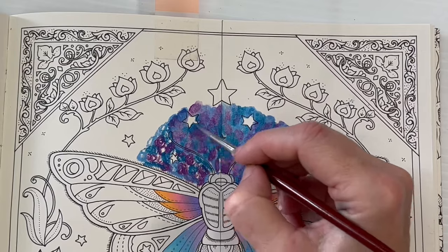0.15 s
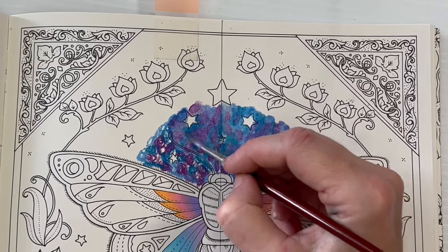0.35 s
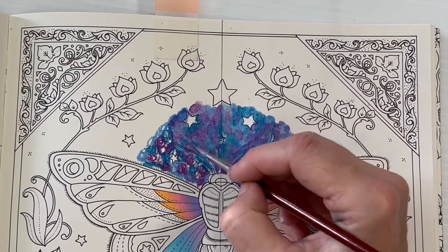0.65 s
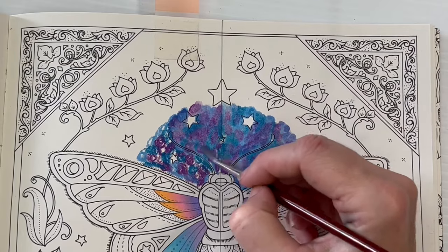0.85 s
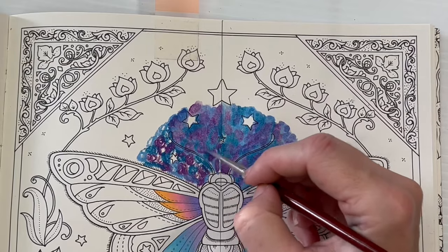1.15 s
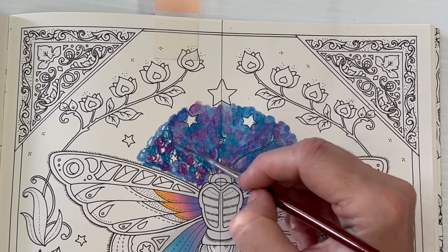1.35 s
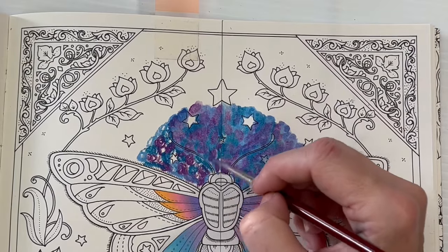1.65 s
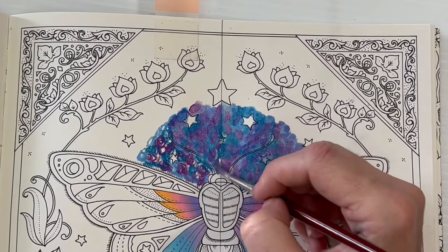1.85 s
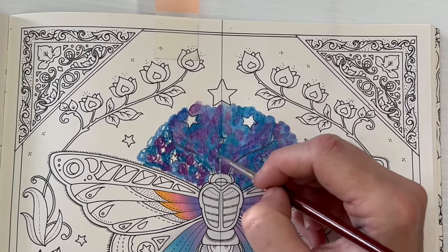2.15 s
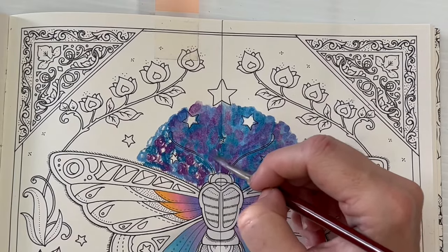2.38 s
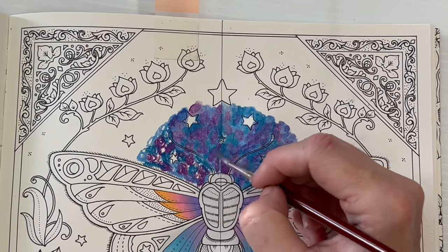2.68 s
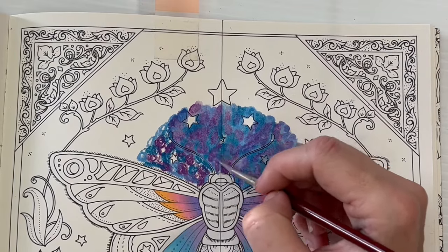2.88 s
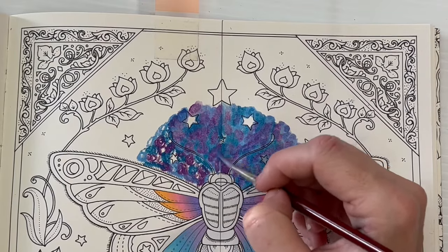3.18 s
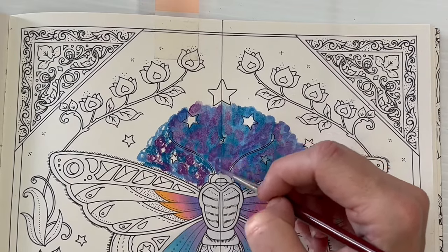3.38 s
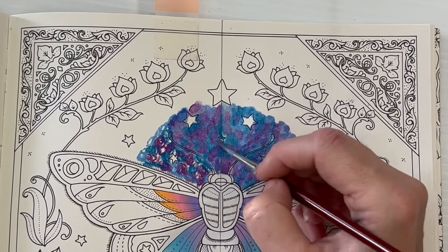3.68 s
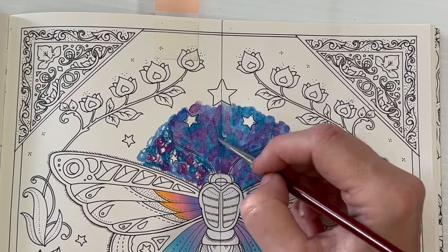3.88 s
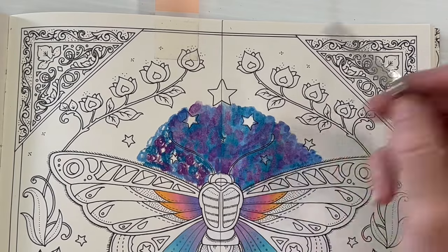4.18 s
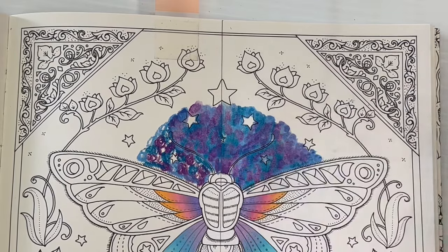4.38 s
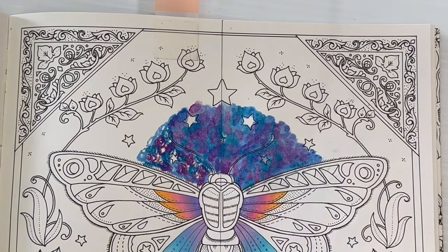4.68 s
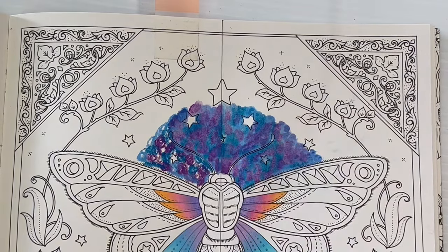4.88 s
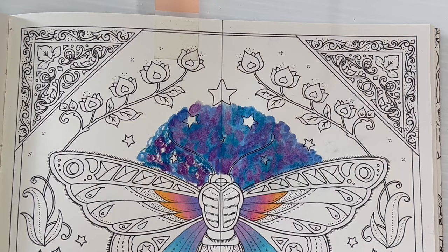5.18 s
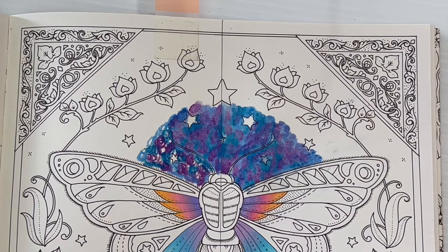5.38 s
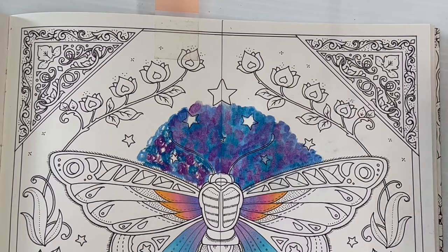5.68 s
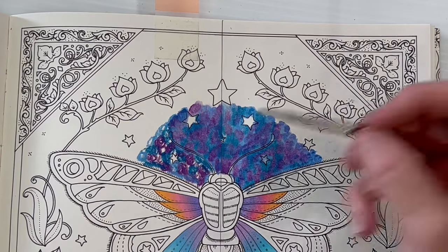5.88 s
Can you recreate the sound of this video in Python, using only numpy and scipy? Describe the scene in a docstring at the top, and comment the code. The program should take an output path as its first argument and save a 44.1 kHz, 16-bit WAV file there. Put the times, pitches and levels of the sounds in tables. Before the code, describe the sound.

A small, quiet room heard close to a desk, with soft air noise and a faint mains hum. Behind it a low engine drone, like a distant propeller plane, throbs early, slowly sinks in pitch and flutters, its rumble nearest around 4 s. From 0 to 3.5 s soft grainy rubs on paper come and go, with faint dabs and tiny ticks, one clearer at 2.6 s. A faint low whistle sounds at 2.9 s and tiny falling chirps near 3.6 and 4.1 s. Bristles swish at 3.6 and 4.1 s, with crisp snaps at 4.2 and 4.3 s. At 4.7 s a brush knocks a glass jar: a bright, high ring with a dull bump and a quick spatter of bubbly drops. At 5.06 s a second knock clacks, choked short. A faint whistle and tick follow at 5.4 s, then light swishes from 5.8 s and a dull desk tap at 6 s.

```python
"""A brush is knocked twice on a glass water jar: decaying glass modes under a handle click and a ferrule clack.
The first knock rings free and shakes drops into the water, as short bubble tones; the second is choked on the rim.
Around it someone paints at a desk in a small room: shaped noise makes soft rubs on paper, bristle swishes and ticks.
Behind, sinking tones and rumble make a far engine, like a passing propeller plane; gliding tones make faint
chirps and whistles, perhaps a bird outside; air noise and a mains hum fill the room."""
import sys
import numpy as np
from scipy import signal
from scipy.fft import rfft, irfft, next_fast_len
from scipy.io import wavfile
from scipy.ndimage import uniform_filter1d, map_coordinates

SR = 44100
rng = np.random.default_rng(int(sys.argv[2]) if len(sys.argv) > 2 else 0)


def file_out(sig):
    """Save sig as 16-bit WAV at sys.argv[1]."""
    # one column per channel
    cols = np.atleast_2d(sig).T
    # limit, then scale
    lim = np.clip(cols, -1, 1)
    pcm = np.round(lim * 32767).astype(np.int16)
    wavfile.write(sys.argv[1], SR, pcm)


N = 266364  # length of the scene in samples


def amp(db):
    """Decibels to gain."""
    return 10 ** (np.asarray(db) / 20)


def unit(x):
    """Scale to rms 1."""
    return x / np.sqrt(np.mean(x ** 2) + 1e-20)


def along(points, hz):
    """Read (frequency [Hz], value) points on a log frequency axis."""
    f, v = np.transpose(points)
    return np.interp(np.log(hz + 1), np.log(f + 1), v)


def curve(rows):
    """Read (time [s], value) points at every sample."""
    return np.interp(np.arange(N) / SR, *np.transpose(rows))


def wobble(rate):
    """A smooth random curve with rate knots a second."""
    knots = rng.standard_normal(int(N * rate / SR) + 4)
    return map_coordinates(knots, [np.arange(N) * rate / SR])


def filtered(x, response):
    """Shape x with a response given as a function of frequency."""
    n = x.shape[-1]
    padded = next_fast_len(n + SR // 4)
    spectrum = rfft(x, padded) * response(np.fft.rfftfreq(padded, 1 / SR))
    return irfft(spectrum, padded)[..., :n]


def coloured(spectrum, shape):
    """Noise of rms 1 with the given spectrum."""
    white = rng.standard_normal(shape)
    return unit(filtered(white, lambda hz: amp(along(spectrum, hz))))


def add(track, s, sound):
    """Mix a sound into the track at time s."""
    part = track[..., round(s * SR):][..., :sound.shape[-1]]
    part += sound[..., :part.shape[-1]]


# how alike left and right are: (frequency [Hz], likeness [0-1])
LIKENESS = [(100, 1), (290, .9), (640, 0.21), (1400, 0.32), (2300, 1), (4500, 1), (7000, 0.29),
            (15000, .15)]


def diffuse(spectrum):
    """Stereo noise that arrives from all round the room: a shared middle plus opposed sides."""
    def mid_side_gains(hz):
        turn = np.arccos(np.clip(along(LIKENESS, hz), -1, 1)) / 2
        return np.array([np.cos(turn), np.sin(turn)])
    mid, side = filtered(coloured(spectrum, (2, N)), mid_side_gains)
    return unit(np.array([mid + side, mid - side]))


def patchy(x, depth_db):
    """The colour of a noise shifts from moment to moment."""
    z = signal.stft(x, nperseg=1024)[2]
    field = rng.standard_normal(z.shape[1:])
    field = uniform_filter1d(field, size=4, axis=0)  # over frequency
    field = uniform_filter1d(field, size=14, axis=1)  # over time
    return signal.istft(z * amp(depth_db * unit(field)), nperseg=1024)[1][:, :N]


# how long the room's tail lasts: (frequency [Hz], decay t60 [s])
ROOM_DECAY = [(200, 0.92), (3000, 0.34), (7000, 0.35), (11000, 0.33), (15000, .22)]


def room(x, build_s, lasting=1):
    """The walls' answer: it builds up, then each frequency dies at its own speed."""
    hz, t, z = signal.stft(rng.standard_normal((2, SR // 2)), SR, nperseg=256)
    width = along([(2500, 0.083), (4500, 0.24), (7000, 0.99)], hz)[:, None]  # wider in the treble
    z = np.array([z[0] + width * z[1], z[0] - width * z[1]]) / np.sqrt(1 + width ** 2)
    t60 = lasting * along(ROOM_DECAY, hz)[:, None]
    envelope = amp(-60 * t / t60) * (1 - np.exp(-t / build_s))
    tail = signal.istft(z * envelope, SR, nperseg=256)[1]
    return signal.fftconvolve(x[None], tail / np.linalg.norm(tail[0]), axes=1)[:, :N]


def from_right(x, lag_s):
    """A near sound reaches the right side a moment before the left."""
    side = np.array([[-1], [1]])
    return filtered(x, lambda hz: np.exp(np.pi * 1j * hz * lag_s * side))


# the air's starting level eases off slowly
AIR_DB, AIR_FALL_DB_PER_S = -58, .5
# relative spectrum of the room's air: (frequency [Hz], density [dB per Hz])
AIR_SPECTRUM = [(100, 1.5), (300, -2), (430, 1.2), (600, 1.5), (1000, 1), (1350, -1), (1520, 1), (1750, -7),
                (2350, -12), (2650, -10.5), (2950, -16.5), (3500, -19), (4500, -26), (6000, -31.5),
                (11000, -36), (15500, -48.5)]
# stereo balance of the air: (frequency [Hz], left minus right [dB])
AIR_BALANCE = [(400, 1.5), (750, -0.5), (1290, -5.5), (2200, 0)]


def room_tone():
    """Soft air noise, leaning right in the mid band, and a faint mains hum that wavers in level."""
    t = np.arange(N) / SR
    mains = amp(-55.5 + 2.6 * wobble(3.0)) * np.sin(2 * np.pi * 100 * t)  # 100 Hz
    side = np.array([[1], [-1]])
    air = patchy(diffuse(AIR_SPECTRUM), depth_db=2.0)
    air = filtered(air, lambda hz: amp(along(AIR_BALANCE, hz) / 2 * side))
    return mains + amp(AIR_DB - AIR_FALL_DB_PER_S * t + 0.78 * wobble(5.2)) * air


# the engine's two notes start here and sink steadily as it passes
MAIN_HZ, MAIN_SAG_HZ_PER_S = 82.2, 1.18
LOWER_HZ, LOWER_SAG_HZ_PER_S = 70, 1.55
# the main note throbs at first, ever faster and shallower
THROB_START_S, THROB_PER_S, THROB_GAIN_PER_S2 = .05, 2.2, 1.8
THROB_DB, THROB_FADE_S = 4, 1.5
# the rumble swells to this level at the nearest point of the pass, then recedes
RUMBLE_DB, NEAREST_S, PASS_S = -50.5, 4.1, 3.5
# main note: (time [s], level [dB])
MAIN_LEVEL = [(0, -47), (.22, -44), (.36, -37.5), (.8, -37.5), (1.6, -40), (2.2, -39.5), (2.35, -43.5),
              (2.7, -41), (3.3, -41), (5.1, -48), (5.8, -44.5)]
# its octave overtone: (time [s], level [dB])
OCTAVE_LEVEL = [(0, -53), (.65, -48.5), (1.7, -52), (2.3, -47.5), (3.6, -47.5), (6.04, -69)]
# lower note: (time [s], level [dB])
LOWER_LEVEL = [(0, -59.5), (2.6, -57), (2.8, -44.5), (3, -40.5), (3.2, -52.5), (3.7, -58), (4.8, -54.5),
               (4.95, -47), (6.04, -61)]
# relative spectrum of the rumble: (frequency [Hz], density [dB per Hz])
RUMBLE_SPECTRUM = [(20, -20), (35, -9.5), (55, 3.5), (90, -6), (115, 2), (140, 3), (200, 1), (240, -3),
                   (290, -18.5), (450, -24), (1000, -62.5)]


def engine(main_flutter_db, octave_flutter_db, lower_flutter_db):
    """Low notes and rumble come through the walls; moving air makes them flutter, and they beat as they sink."""
    t = np.arange(N) / SR
    main_phase = 2 * np.pi * np.cumsum(MAIN_HZ - MAIN_SAG_HZ_PER_S * t) / SR
    lower_phase = 2 * np.pi * np.cumsum(LOWER_HZ - LOWER_SAG_HZ_PER_S * t) / SR

    age = t - THROB_START_S
    throbs = age * (THROB_PER_S + THROB_GAIN_PER_S2 * age / 2)
    throb_db = THROB_DB * np.exp(-age / THROB_FADE_S) * np.cos(2 * np.pi * throbs)

    main_db = curve(MAIN_LEVEL) + throb_db + main_flutter_db * wobble(7)
    main = amp(main_db) * np.sin(main_phase + 0.18 * wobble(11.0))
    octave_db = curve(OCTAVE_LEVEL) + octave_flutter_db * wobble(9)
    octave = amp(octave_db) * np.sin(2 * main_phase + rng.uniform(0, 2 * np.pi))
    lower_db = curve(LOWER_LEVEL) + lower_flutter_db * wobble(5.5)
    lower = amp(lower_db) * np.sin(lower_phase + 0.13 * wobble(2.0))

    nearness = 1 / np.hypot(1, (t - NEAREST_S) / PASS_S)
    rumble = nearness * amp(RUMBLE_DB + 1.2 * wobble(8)) * diffuse(RUMBLE_SPECTRUM)
    return np.sqrt(2) * (main + octave + lower) + rumble  # root 2: note levels are rms


# falling chirps and two lower whistles, levels before the mix:
# (time [s], length [s], first pitch [Hz], final pitch [Hz], glide [s], level [dB])
BIRD_NOTES = [(2.88, 0.063, 1525, 1493, .02, -67), (3.594, 0.053, 6500, 5210, .009, -67.5),
              (3.634, 0.018, 4550, 3530, .008, -59), (4.111, .03, 6100, 5180, .006, -67.5),
              (4.143, .05, 4730, 3190, .006, -58.5), (5.41, 0.053, 1476, 1470, 0.03, -63.5)]


def bird(rough):
    """Slightly hoarse notes that swell fast, hang on their first pitch for a moment, drop and level off."""
    out = np.zeros(N)
    for s, length, first_hz, final_hz, glide_s, db in BIRD_NOTES:
        t = np.arange(round(length * SR)) / SR
        glide = np.exp(-(t / glide_s) ** 3)
        hz = final_hz + (first_hz - final_hz) * glide
        hz = hz * (1 + rough * wobble(900)[:len(t)])
        swell = np.sin(np.pi * (t / length) ** .7)
        add(out, s, amp(db) * swell * np.sin(2 * np.pi * np.cumsum(hz) / SR))
    return out


# soft rubbing swells on the paper, from the hand or brush strokes: (time [s], length [s], level [dB])
PAPER_RUBS = [(0.079, 0.24, -69), (0.598, 0.49, -66), (1.241, .58, -74.5), (1.841, .44, -75),
              (2.601, .42, -78), (3.032, .5, -76), (4.098, .17, -70), (4.301, 0.28, -77),
              (5.856, 0.22, -76.5)]
# relative spectrum of rubbed paper: (frequency [Hz], density [dB per Hz])
PAPER_SPECTRUM = [(600, -5.5), (1500, 12.5), (2200, 4), (2650, 7), (3100, 0.5), (4700, -1), (5600, -6),
                  (7000, -19), (12000, -25.5), (15500, -29.5)]


def paper_rubs(grain_db):
    """The hand or brush strokes rub the paper in soft, slightly grainy swells of noise."""
    out = np.zeros(N)
    for s, length, db in PAPER_RUBS:
        u = np.linspace(0, 1, round(length * SR))
        rub = coloured(PAPER_SPECTRUM, N)[:len(u)]
        add(out, s, amp(db) * np.sin(np.pi * u) * rub)
    return out * amp(grain_db * wobble(120))


# soft swishes of the wet bristles: (time [s], length [s], level [dB])
BRISTLE_SWISHES = [(3.585, 0.14, -69), (4.11, 0.218, -65.5), (5.785, 0.13, -71), (5.92, 0.19, -74.5)]
# relative spectrum of dragging bristles: (frequency [Hz], density [dB per Hz])
BRISTLE_SPECTRUM = [(2000, -20), (4000, -1), (5500, 5.5), (7700, -4), (9500, -13), (15500, -22)]


def swishes(rise_s, grain_db):
    """Bristles drag briefly and unevenly: a quick swell and a slow release."""
    out = np.zeros(N)
    for s, length, db in BRISTLE_SWISHES:
        t = np.arange(round(length * SR)) / SR
        swell = (1 - np.exp(-t / rise_s)) * (1 - t / length)
        add(out, s, amp(db) * swell * coloured(BRISTLE_SPECTRUM, len(t)))
    return out * amp(grain_db * wobble(90))


# the clearest ticks of wet bristles and ferrule: (time [s], level [dB], before the snap's trim)
CLEAR_TICKS = [(0.3273, -67), (0.7048, -66), (2.142, -68), (2.4788, -66), (2.646, -56), (2.9756, -67),
               (3.8247, -70), (3.9754, -70), (4.1212, -53), (4.1323, -52), (4.1808, -40), (4.291, -34.5),
               (5.4534, -60), (5.911, -62)]
# faint dabs while painting: the stretch they fill, mean level before the trim, and scatter
PAINT_START_S, PAINT_END_S, DAB_DB, DAB_SCATTER_DB = 0.11, 3.3, -73.5, 3
# relative spectrum of a tick: (frequency [Hz], density [dB per Hz])
TICK_SPECTRUM = [(1000, -14), (3000, -9.5), (5500, 5), (7500, 5), (10000, -4), (11700, -4.5), (15500, -12)]
TAP_S, TAP_DB, TAP_T60_S = 6.0165, -45, 0.025  # a dull tap on the desk
# relative spectrum of the tap: (frequency [Hz], density [dB per Hz])
TAP_SPECTRUM = [(150, -20), (400, 17), (900, -11), (1800, 3), (4200, -17), (8500, -14.5), (10500, -33)]


def ticks(t60, smear_db, smear_t60, count):
    """Tiny snaps as the brush touches things, each in a soft scuff of bristles; one dull tap as the hand returns."""
    out, t = np.zeros(N), np.arange(SR // 20) / SR
    # one dab at a random moment in each equal slice of the stretch
    slices = (np.arange(count) + rng.random(count)) / count
    dab_s = PAINT_START_S + (PAINT_END_S - PAINT_START_S) * slices
    dabs = zip(dab_s, DAB_DB + DAB_SCATTER_DB * rng.standard_normal(count))
    for s, db in [*CLEAR_TICKS, *dabs]:
        snap = amp(db - 6.5 - 60 * t / t60)  # 6.5 dB trim
        scuff = amp(smear_db - 60 * t / smear_t60) * (1 - np.exp(-t / 0.0035))
        add(out, s, (snap + scuff) * coloured(TICK_SPECTRUM, len(t)))
    add(out, TAP_S, amp(TAP_DB - 60 * t / TAP_T60_S) * coloured(TAP_SPECTRUM, len(t)))
    return out


THUD_DB, THUD_T60_S = -47.5, 0.06  # level before each knock's ring level is added
# relative spectrum of the bump: (frequency [Hz], density [dB per Hz])
THUD_SPECTRUM = [(200, -8.5), (350, 0), (560, 6), (900, -3), (1400, -9), (2000, 2.5), (2800, 2),
                 (3600, -20)]


def thuds():
    """Each knock pushes the full jar against the desk: a short dull bump that follows the ring's strength."""
    out, t = np.zeros(N), np.arange(SR // 10) / SR
    for s, ring_db, *_ in RIM_KNOCKS:
        bump = amp(THUD_DB + ring_db - 60 * t / THUD_T60_S)
        add(out, s, bump * coloured(THUD_SPECTRUM, len(t)))
    return out


# the water churns under the drops: (time [s], level [dB])
SLOSH_LEVEL = [(4.69, -85), (4.705, -53), (4.755, -56.5), (4.785, -71), (4.817, -55.5), (4.87, -64),
               (4.97, -90)]
# relative spectrum of the churning: (frequency [Hz], density [dB per Hz])
WATER_SPECTRUM = [(250, -5), (400, 1.5), (600, 3), (950, 0), (1400, -4), (2600, 4), (3800, -10.5),
                  (6000, -14), (12000, -26)]


def slosh(lumps_db):
    """The water splashes about in uneven lumps of noise."""
    lumpy = amp(lumps_db * wobble(250)) * coloured(WATER_SPECTRUM, N)
    return amp(curve(SLOSH_LEVEL)) * unit(lumpy)


# the biggest drops, before a 1 dB lift:
# (time [s], pitch [Hz], level [dB], rise [share of the pitch])
BIG_DROPS = [(4.705, 1220, -46.5, 0.22), (4.729, 1950, -41.5, .3), (4.745, 2500, -41, -.1),
             (4.749, 960, -49, 0.1), (4.782, 4400, -47, 0.63), (4.801, 3600, -43, .1),
             (4.804, 1710, -47, .25), (4.81, 2900, -38, -0.098), (4.814, 2400, -42, .15),
             (4.815, 764, -44.5, .1), (4.823, 3400, -45, .5), (4.829, 4500, -51, 0.6),
             (4.841, 4850, -44, 0.8), (4.856, 2640, -47, -.05), (4.863, 1570, -45, 0.34),
             (4.884, 3600, -53.5, 0.091), (4.907, 3530, -50, 0.03)]
# the finer spray: its length, middle pitch and pitch range
SPRAY_S, SPRAY_HZ, SPRAY_OCTAVES = .2, 1493, 3.4
# its top level before the lift, range of strengths, and fading
SPRAY_DB, SPRAY_RANGE_DB, SPRAY_FADE_DB_PER_S = -49, 9, 46


def drops(cycles, spray_rise, count):
    """Each drop traps a bubble that rings briefly and mostly rises in pitch; a finer spray dies away among them."""
    out, t = np.zeros(N), np.arange(SR // 16) / SR
    when, size, weakness, bend = rng.random((count, 4)).T
    delay = SPRAY_S * (np.arange(count) + when) / count
    spray_s = RIM_KNOCKS[0][0] + delay  # counted from the first knock
    spray_hz = SPRAY_HZ * 2 ** (SPRAY_OCTAVES * (size - .5))
    spray_db = SPRAY_DB - SPRAY_RANGE_DB * weakness - SPRAY_FADE_DB_PER_S * delay
    spray = np.transpose([spray_s, spray_hz, spray_db, spray_rise * bend])
    for s, hz, db, rise in [*BIG_DROPS, *spray]:
        age = t / (cycles / hz + 0.017)  # in t60s: low bubbles ring longer
        phase = 2 * np.pi * np.cumsum(hz * (1 + rise * np.minimum(age, 1))) / SR
        add(out, s, amp(db + 1.0 - 60 * age) * (1 - np.exp(-t / 0.0023)) * np.sin(phase))
    return out


# handle on the rim: (time [s], glass ring [dB], handle click [dB], click t60 [s], ferrule clack [dB],
# free ringing [s], flattening [Hz], share of muting [0-1])
RIM_KNOCKS = [(4.6942, -0.5, -17, 0.026, -9.5, 1, -1, 0), (5.0584, -12, -22, 0.014, 1.5, 0.0065, 64, 0.8)]
# the jar's modes, mostly close pairs, levels before each knock's ring level:
# (frequency [Hz], level [dB], t60 [s], level change at full muting by the handle [dB])
GLASS_MODES = [(3166, -22.5, .31, -2), (3141, -29, .42, -9), (3151, -37, .5, 11), (5200, -32.5, .16, -10),
               (1950, -38, .035, -16), (7097, -24.5, .15, 0), (7143, -41, .44, 1), (7070, -39, .27, 7),
               (9283, -25.5, .18, -2), (9372, -28, .06, -2), (9645, -23.5, .075, -12),
               (9694, -33, .14, -10), (10380, -27, .07, -8), (11377, -24, .12, -4),
               (11462, -19.5, .065, -11), (11558, -26, .06, -6), (11870, -24, .04, -3),
               (13322, -24.5, .06, -10), (15080, -32, .09, -5), (15354, -33, .11, -5),
               (15570, -38, .07, -5)]
# relative spectrum of the handle's short click: (frequency [Hz], density [dB per Hz])
HANDLE_SPECTRUM = [(150, -44.5), (500, -26), (1400, -30.5), (2300, -15.5), (3050, 1), (4000, -17),
                   (5300, -4.5), (6200, -1), (7200, -4), (8200, 7.5), (9800, -7.5), (11700, -3.5),
                   (13300, -6.5), (14700, -4.5), (16000, -13)]
# the metal ferrule's hard clack, before each knock's clack level: (frequency [Hz], level [dB], t60 [s])
FERRULE_MODES = [(5035, -34.5, 0.008), (6406, -29, 0.0055), (8400, -21.5, 0.007), (12330, -30, .006),
                 (14600, -19.5, .006)]
LOW_CUT_HZ = 1510  # the knocks are thinned below this; the dull thud fills the lows


def knocks(attack_s, damped_t60, choked_db, slosh_cents, chatter_db, chatter_cents):
    """Handle and ferrule click and the glass rings, wavering with the water, until the handle chokes it on the rim."""
    out, t = np.zeros(N), np.arange(SR * 3 // 5) / SR
    hz, mode_db, t60, muting_db = np.transpose(GLASS_MODES)[:, :, None]
    sign = (-1) ** np.arange(len(GLASS_MODES))[:, None]  # paired modes start opposed, then beat
    clack = np.zeros(len(t))
    for f, db, life in FERRULE_MODES:
        clack += amp(db - 60 * t / life) * np.sin(2 * np.pi * (f * t + rng.random()))
    for s, ring_db, click_db, click_t60, clack_db, free_s, flat_hz, muted in RIM_KNOCKS:
        strength_db = mode_db + muted * muting_db + .5 * rng.standard_normal(hz.shape)
        water_cents = slosh_cents * wobble(22)[:len(t)]
        rim_cents = (t > free_s) * chatter_cents * wobble(265)[:len(t)]
        waver = 2 ** ((water_cents + rim_cents) / 1200)
        phase = 2 * np.pi * (hz - flat_hz) * np.cumsum(waver) / SR
        ring = np.sum(sign * amp(strength_db - 60 * t / t60) * np.sin(phase), axis=0)
        # held on the rim, the ring is choked to a faint, rough remainder
        held_s = np.maximum(t - free_s, 0)
        choke_db = np.maximum(-60 * held_s / damped_t60, choked_db)
        choke_db = choke_db + (held_s > 0) * chatter_db * wobble(146)[:len(t)]
        glass = amp(ring_db + choke_db) * ring * (1 - np.exp(-t / attack_s))
        click = amp(click_db - 60 * t / click_t60) * coloured(HANDLE_SPECTRUM, len(t))
        add(out, s, glass + click + amp(clack_db) * clack)
    return signal.sosfilt(signal.butter(2, LOW_CUT_HZ, "high", fs=SR, output="sos"), out)


# how strongly the walls answer the jar: (frequency [Hz], level [dB])
WALL_ANSWER = [(1000, -14), (3100, -13.5), (5200, -14), (7000, -9), (8200, -13.5), (10300, -6),
               (11500, -10), (13200, -9.5), (14600, -14.5), (15600, -9)]


def scene():
    """The jar and the brush are close and in the room; the bird is farther off."""
    outside = bird(rough=0.013)
    brush = paper_rubs(grain_db=2.5) + swishes(rise_s=0.031, grain_db=3)
    brush = brush + ticks(t60=0.0098, smear_db=-73, smear_t60=0.055, count=11)
    water = slosh(lumps_db=5.0) + drops(cycles=22, spray_rise=0.25, count=60)
    glass = knocks(attack_s=0.0004, damped_t60=0.043, choked_db=-18,
                   slosh_cents=1.2, chatter_db=4, chatter_cents=32)
    jar = thuds() + water + glass

    background = room_tone() + engine(main_flutter_db=0.8, octave_flutter_db=2.0, lower_flutter_db=4.5)
    song = amp(0.5) * outside + room(outside, build_s=0.006, lasting=1.4)
    near = from_right(jar + brush, lag_s=1.9e-5)
    jar_walls = room(filtered(jar, lambda hz: amp(along(WALL_ANSWER, hz))), build_s=0.0016)
    brush_walls = amp(-12.5) * room(brush, build_s=0.0061)
    return background + song + near + jar_walls + brush_walls


TOP_HZ = 15950  # upper band limit


def record(dry):
    """A very steep low-pass cuts the sound above the band limit."""
    return filtered(dry, lambda hz: 1 / np.sqrt(1 + (hz / TOP_HZ) ** 160))


dry = scene()
out = record(dry)
file_out(out)
```